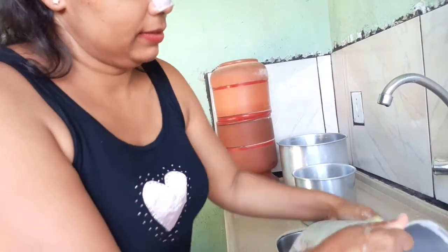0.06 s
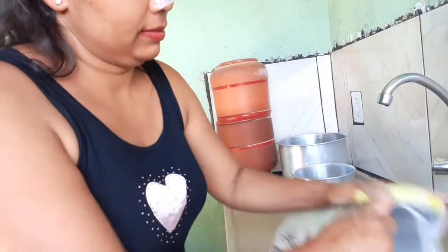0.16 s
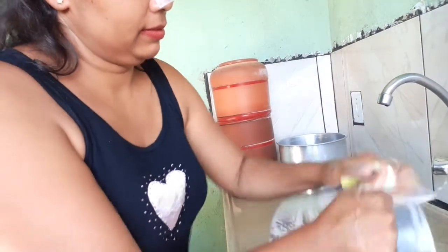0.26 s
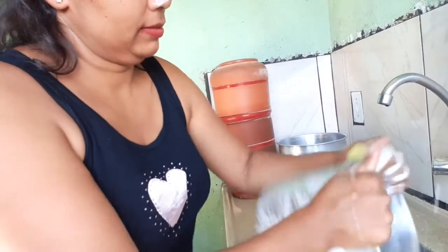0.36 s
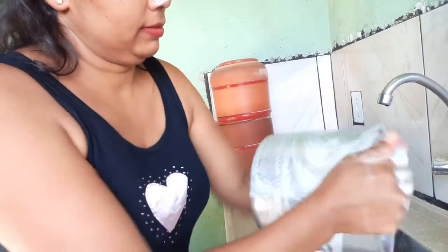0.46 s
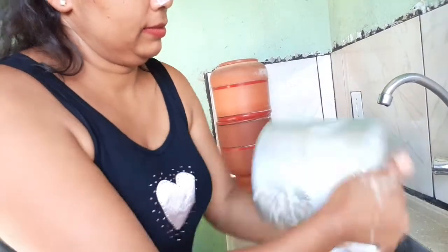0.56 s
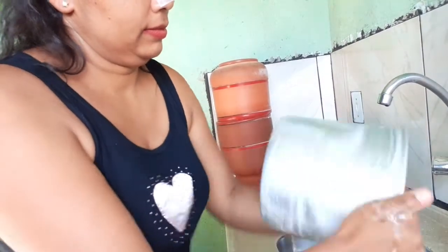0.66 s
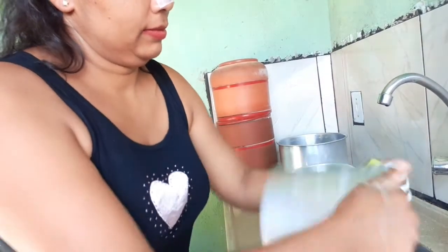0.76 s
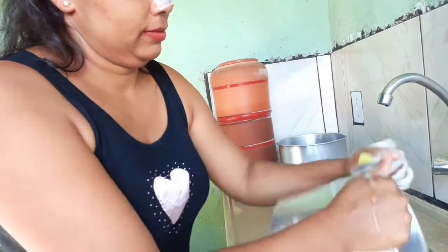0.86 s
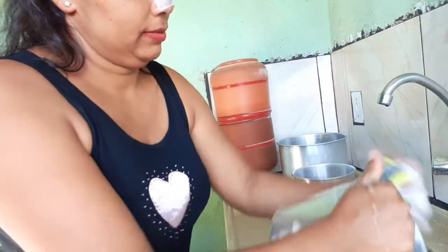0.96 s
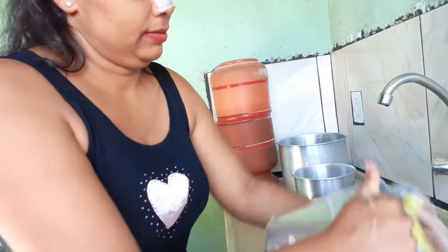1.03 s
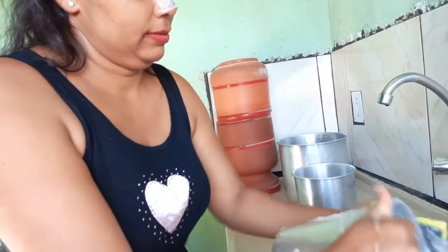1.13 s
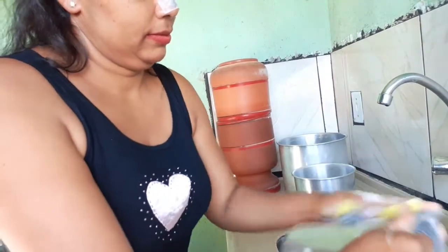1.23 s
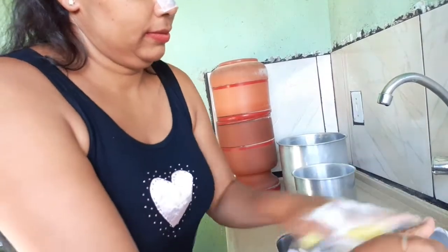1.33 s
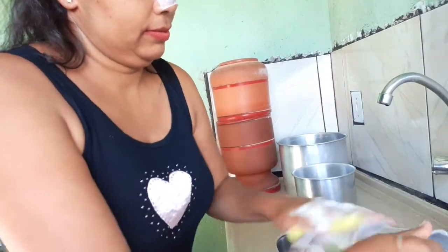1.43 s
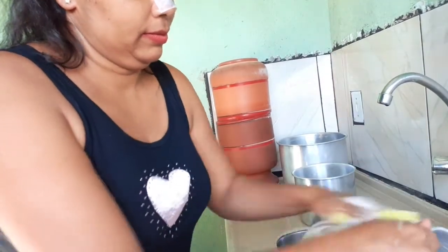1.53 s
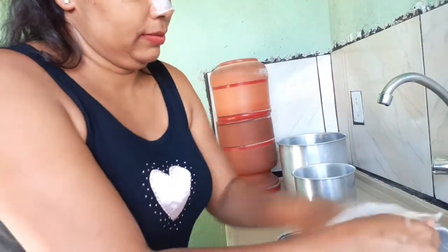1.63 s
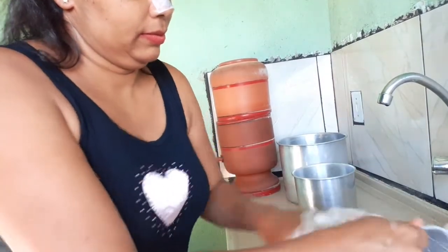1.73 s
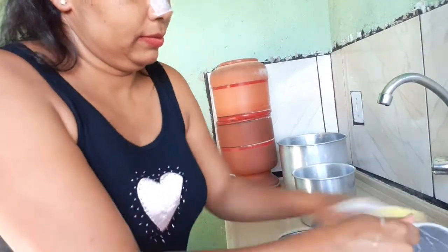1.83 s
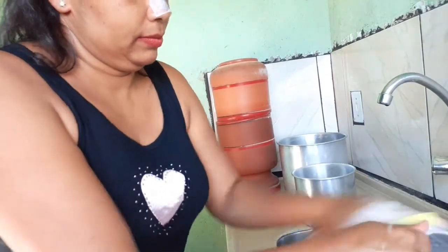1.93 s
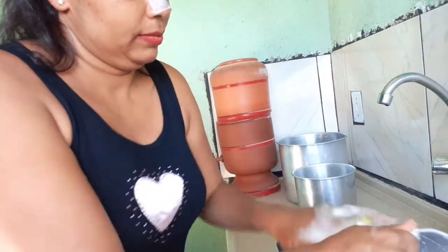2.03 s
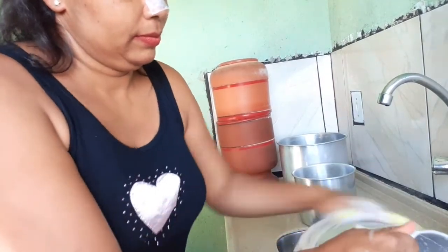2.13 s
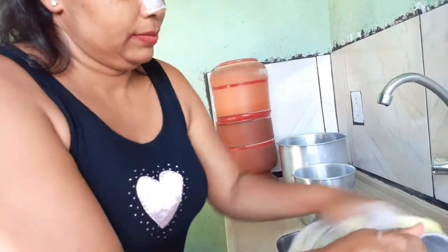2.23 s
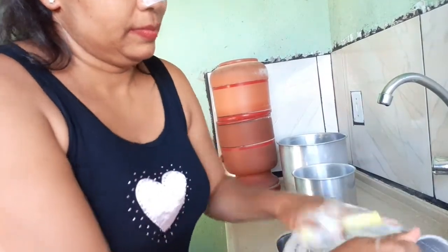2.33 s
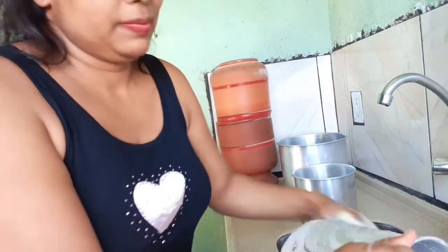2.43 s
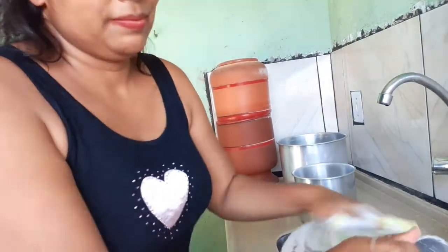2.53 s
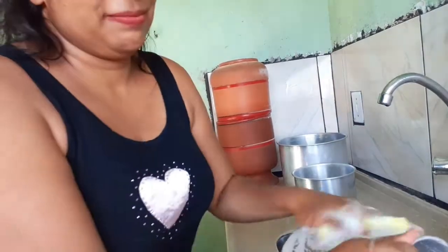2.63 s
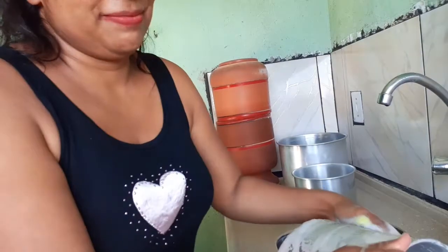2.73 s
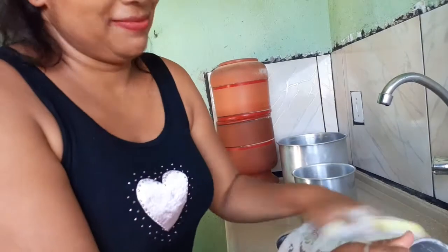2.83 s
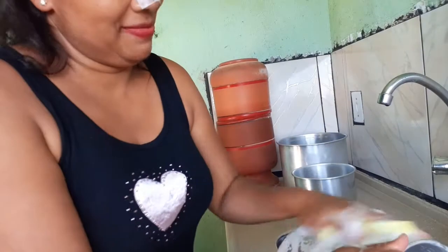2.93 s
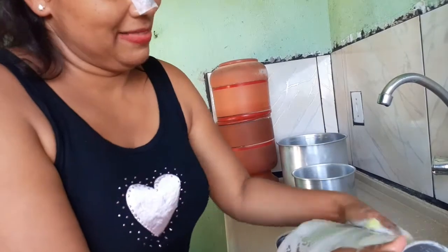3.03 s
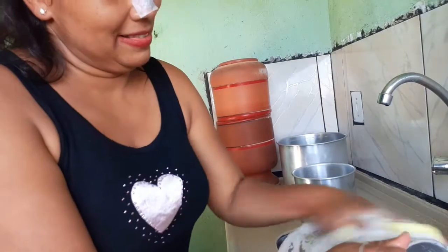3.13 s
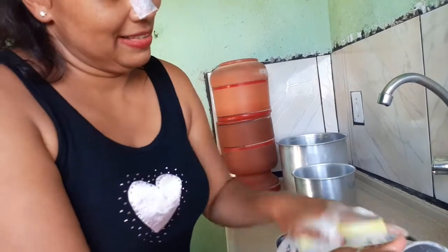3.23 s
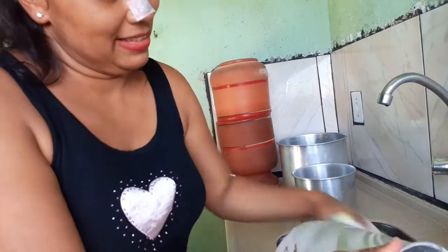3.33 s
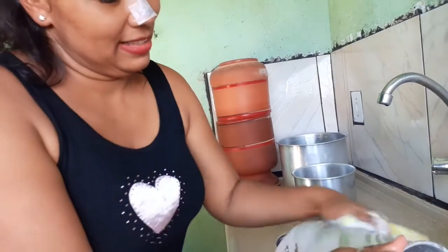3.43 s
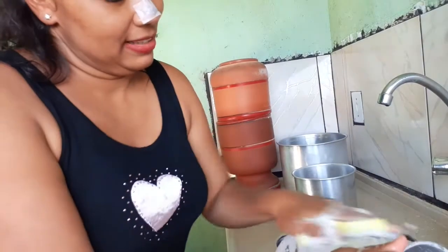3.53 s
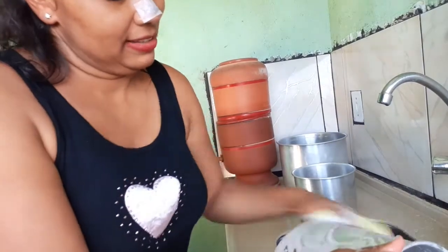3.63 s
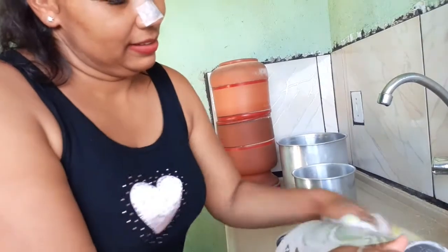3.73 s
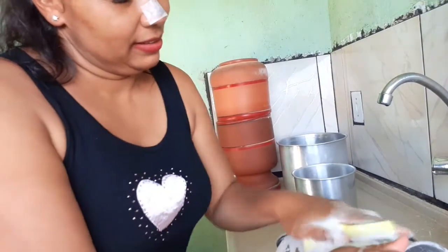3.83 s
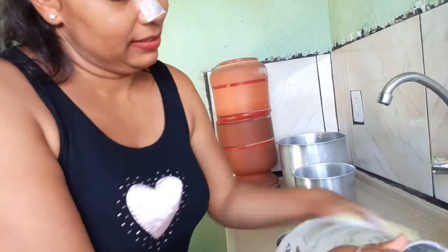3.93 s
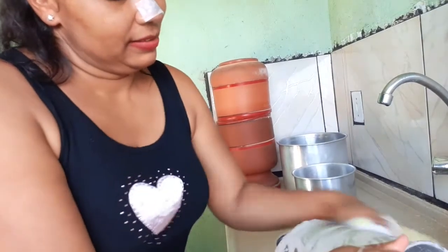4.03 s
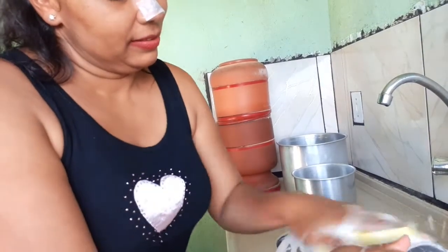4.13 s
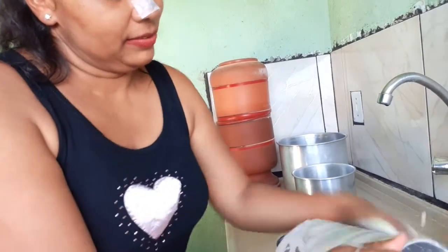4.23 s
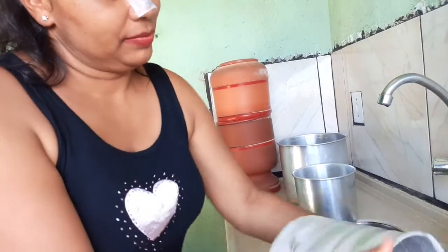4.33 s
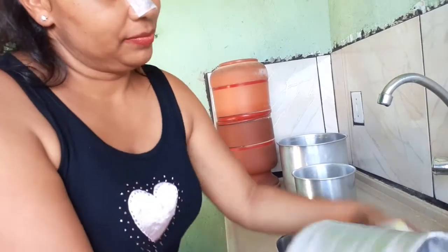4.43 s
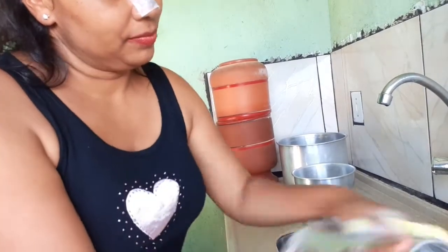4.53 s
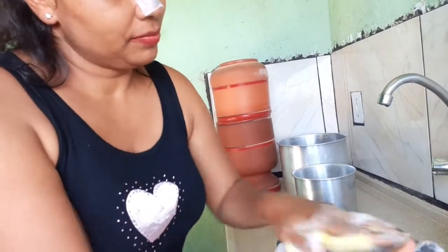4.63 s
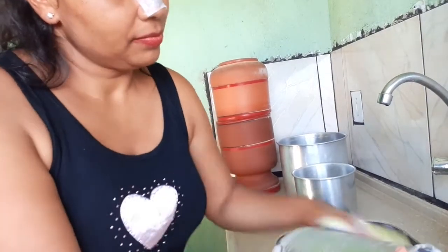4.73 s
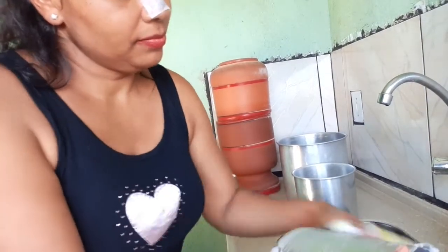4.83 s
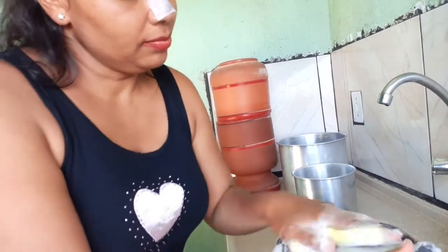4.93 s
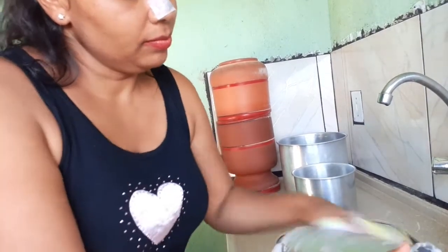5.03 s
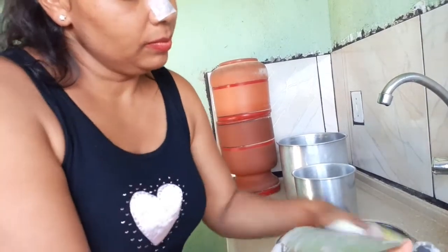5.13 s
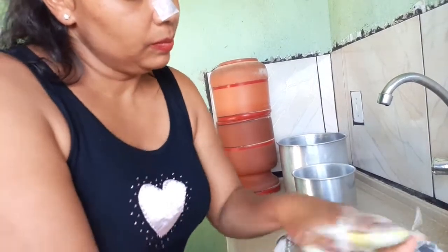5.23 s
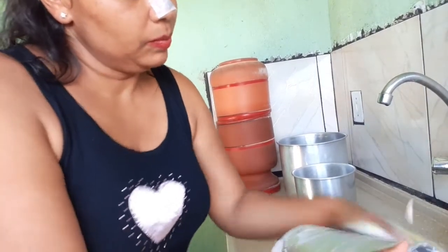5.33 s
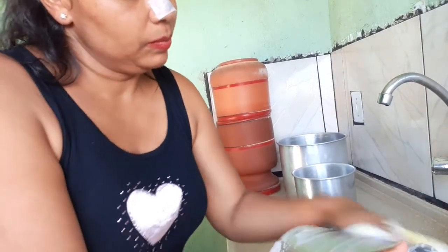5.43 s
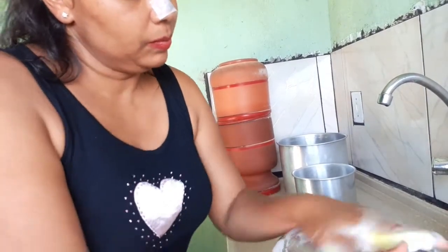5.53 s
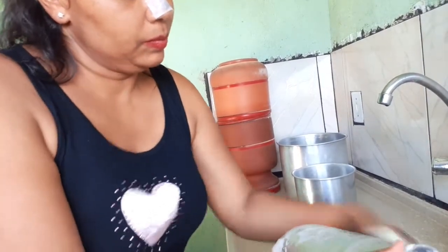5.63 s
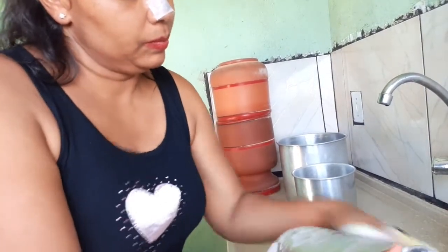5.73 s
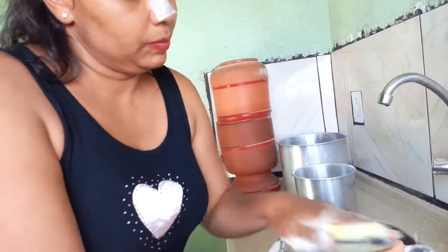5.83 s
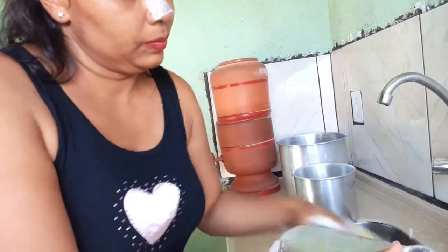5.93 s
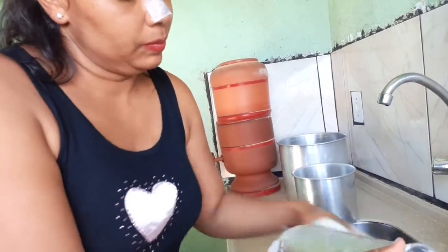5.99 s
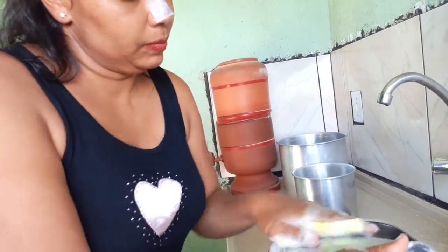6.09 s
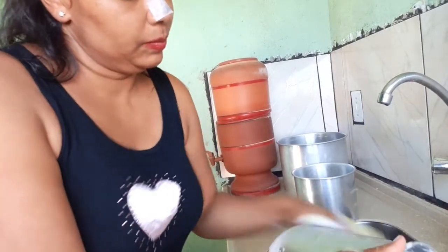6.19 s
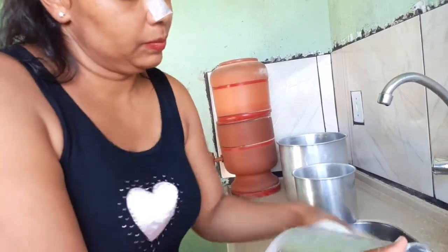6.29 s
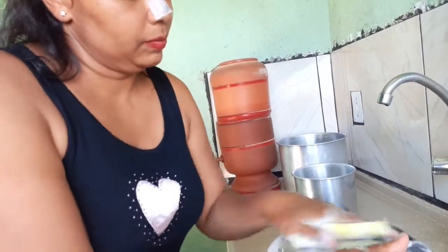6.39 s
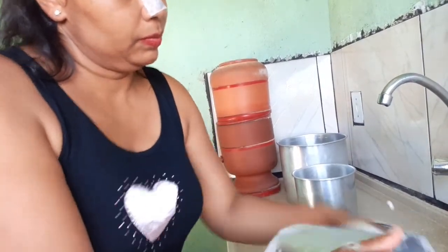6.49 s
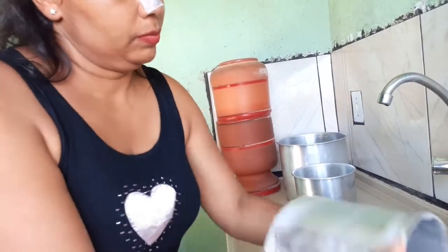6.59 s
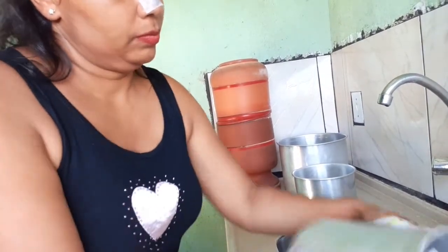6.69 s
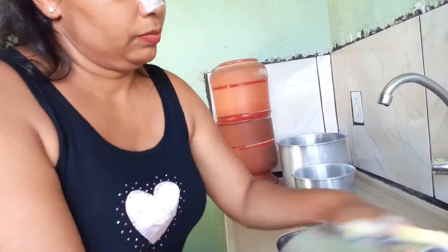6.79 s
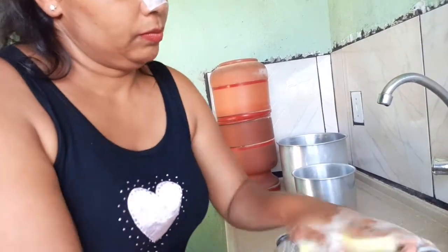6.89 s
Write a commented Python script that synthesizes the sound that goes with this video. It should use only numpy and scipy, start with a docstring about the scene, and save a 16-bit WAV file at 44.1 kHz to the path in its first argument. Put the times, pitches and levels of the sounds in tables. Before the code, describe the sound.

A soapy sponge scours a thin metal pot in quick back-and-forth rasps, with one loud hollow boom as it bumps the sink.

```python
"""At a kitchen sink in a small tiled room, a soapy aluminium pot is scoured with a sponge.
Fibres hiss and rasp in back-and-forth strokes: coloured noise, roughened by many tiny snaps.
The pot's wall rings faintly under them as resonant noise, and its base rubs on the basin.
Bumps boom in the sink as decaying modes; short noise bursts are wet slaps, rubs and the bumps' bright crack.
Behind lie quiet room air and a faint low drone."""
import sys
import numpy as np
from scipy import signal
from scipy.fft import rfft, irfft, next_fast_len
from scipy.io import wavfile
from scipy.ndimage import map_coordinates

SR = 44100
rng = np.random.default_rng(int(sys.argv[2]) if len(sys.argv) > 2 else 0)


def int16_out(signal):
    """Quantize to a 16-bit WAV file."""
    q = np.round(np.clip(np.atleast_2d(signal).T, -1, 1) * 32767)
    wavfile.write(sys.argv[1], SR, q.astype(np.int16))


N = 306617
TIME = np.arange(N) / SR
FREQ = np.fft.rfftfreq(N, 1 / SR) + 1e-3  # just above zero, so that its logarithm exists
LEFT_LAG_S = 9e-5  # the right microphone is nearer


def undb(db):
    """Decibels to gain."""
    return 10 ** (np.asarray(db) / 20)


def unit(x):
    """Scale to rms 1."""
    return x / np.sqrt(np.mean(x ** 2))


def curves(table):
    """Each column of a table as a line through time."""
    seconds, *columns = np.transpose(table)
    return [np.interp(TIME, seconds, column) for column in columns]


def colour(points):
    """Gain at each frequency from (Hz, dB) points."""
    hz, db = np.transpose(points)
    return undb(np.interp(np.log(FREQ), np.log(hz), db))


def resonances(modes):
    """Gain at each frequency of (Hz, width in Hz, dB) resonances, summed in power."""
    power = 0
    for hz, width, db in modes:
        detuning = hz / width * (FREQ / hz - hz / FREQ)
        power = power + undb(db) ** 2 / (1 + detuning ** 2)
    return np.sqrt(power)


def noise(gain, apart_hz=1250):
    """Coloured noise at two close microphones: alike in the bass, almost unrelated in the treble."""
    size = next_fast_len(N, True)
    hz = np.fft.rfftfreq(size, 1 / SR)
    mid, side = rfft(rng.standard_normal((2, size)))
    spread = np.clip(hz / apart_hz, .22, .83)
    pair = (mid + np.array([[1], [-1]]) * spread * side) / np.sqrt(1 + spread ** 2)
    pair[0] *= np.exp(-2j * np.pi * hz * LEFT_LAG_S)
    return unit(irfft(pair * np.interp(hz, FREQ, gain), size)[:, :N])


def walk(rate):
    """Random wandering of rms 1, in straight lines between `rate` points a second."""
    knots = np.arange(0, N / SR + 1, 1 / rate)
    return unit(np.interp(TIME, knots, rng.standard_normal(len(knots))))


def fade(t, t60):
    """Exponential decay, 60 dB down at t60."""
    return np.exp(-np.log(1000) * t / t60)


def pan(x, db):
    """Tip a pair to the left by db, or to the right if negative."""
    return x * undb(np.array([[db], [-db]]) / 2)


def add(out, s, x):
    """Mix x into out from time s."""
    start = max(int(s * SR), 0)
    part = x[:, :N - start]
    out[:, start:start + part.shape[1]] += part


# Colour of the room air. Each row: frequency in Hz, level in dB per Hz.
AIR_COLOUR = [(25, -24), (60, -21), (150, 6), (400, -4.5), (1000, -7), (4000, -22), (15000, -38)]
# Swell of the low drone. Each row: time in seconds, level in dB before panning.
DRONE_SWELL = [(0, -69), (2.3, -73), (2.9, -64), (3.6, -72), (4.2, -66), (5, -60.5), (5.7, -61.5),
               (6.2, -56.5), (6.95, -63)]


def background():
    """Quiet room air, and a low drone of noise around 64 Hz that slowly swells and ebbs."""
    drone = noise(resonances([(64.0, 31, 0)]) ** 2) * undb(curves(DRONE_SWELL)[0])
    air = undb(-71.5) * noise(colour(AIR_COLOUR))
    return pan(drone, -4.0) + air


# Modes of the sink basin with the pot against it; the base rub stirs them too.
# Each row: frequency in Hz, relative dB struck on its floor, relative dB struck on its wall, t60 in seconds.
SINK_MODES = [(75.4, -24, -9, .75), (111, -18, -3, .66), (121, -14, -5, .52), (161, -8, -.5, .34),
              (180, -12, -8, .35), (197, -3, -6, .32), (234, -4, 1, .37), (259, -2, 0, .42),
              (293, -12, -14, .4), (337, -11, -13, .48), (363, -6, -2, .3), (382, -8, -11, .28),
              (410, -3, -6, .33), (422, 0, -10, .36), (444, -1, -6, .28), (469, -5, -9, .27),
              (496, -4, -7, .4), (511, -5, -6, .27), (530, -6, -12, .25), (552, 0, -7, .27),
              (568, -1, -1, .27), (586, -7, -14, .33), (619, -2, -7, .28), (636, -6, -9, .42),
              (683, -13, -24, .25), (706, -8, -19, .25), (738, -9, -19, .25), (762, -12, -21, .25),
              (781, -9, -21, .27), (823, -15, -18, .3), (843, -10, -14, .27), (871, -8, -16, .25),
              (905, -14, -18, .22), (945, -9, -14, .28), (1005, -23, -20, .27), (1274, -19, -22, .3),
              (1298, -18, -22, .26), (1350, -20, -24, .22), (1421, -24, -26, .28)]
SKEW_HZ = 703  # from here up a mode is one radian out of step between the microphones
BUILD_S, BUILD_CYCLES = .016, 3  # a mode builds up over this time plus this many of its cycles


def sink_modes(t, ears):
    """Each basin mode as a decaying complex tone that builds up, a little out of step at the two ears."""
    mode_hz, _, _, t60s = np.transpose(SINK_MODES)
    skew = rng.choice([-1, 1], len(SINK_MODES)) * np.minimum(mode_hz / SKEW_HZ, 1)
    modes = []
    for hz, t60, angle in zip(mode_hz, t60s, skew):
        envelope = fade(t, t60) * (1 - fade(t, BUILD_S + BUILD_CYCLES / hz))
        phase = 2 * np.pi * hz * ears + np.array([[angle], [-angle]]) / 2
        modes.append(envelope * np.exp(1j * phase))
    return np.array(modes)


# Echoes of the sheet's swing from the tiled corner. Each row: delay in seconds, level in dB.
TILE_ECHOES = [(.0098, -9), (.0132, -9), (.0168, -8), (.024, -7)]
SWING_HZ, SWING_DB = 600, 1.5  # what an ever harder contact would approach
SWING_T60_S, SWING_RISE_T60_S = .03, .0015
OVERTONE_RATIO, OVERTONE_DB = 1.6, -3
SOFT_HZ = 397  # a contact this soft halves the pitch of the swing


def sheet_thud(contact_hz, t, ears):
    """The sheet swings for a few cycles, lower and weaker under a soft contact; the tiles echo it."""
    softness = contact_hz / (contact_hz + SOFT_HZ)
    phase = 2 * np.pi * SWING_HZ * softness * ears
    wave = np.sin(phase) - undb(OVERTONE_DB) * np.sin(OVERTONE_RATIO * phase)
    envelope = fade(t, SWING_T60_S) - fade(t, SWING_RISE_T60_S)
    swing = undb(SWING_DB) * softness * envelope * wave
    echoes = sum(undb(db) * np.roll(swing, int(lag * SR), axis=1) for lag, db in TILE_ECHOES)
    return swing + echoes


# Highest pitch in Hz, spot from 0 floor to 1 wall, share of the ring time.
NUDGE = (218, 0.29, 1.0)


def nudges():
    """Each stroke starts by rocking the pot against the basin with a soft contact."""
    return [(s, nudge_db, *NUDGE) for s, *_, nudge_db in STROKES]


# The dense, weaker ring of basin and counter. Each row: frequency in Hz, level in dB per Hz.
BOOM_COLOUR = [(40, -26.5), (110, -11), (250, -4), (520, -0.5), (880, 2.5), (1120, -15.5), (1350, -4.5),
               (1700, -10.5), (2100, -18.5), (2450, -10), (3000, -31.5)]
BOOM_DB, BOOM_T60_S, BOOM_HIGH_T60_S = -19, .45, .3
# The pot bumps the sink; the two rows near 0.71 s are a tap on the pot held in the hand. Each row: start in #
# seconds, relative level in dB, highest pitch in Hz that the contact excites, spot from 0 floor to 1 wall, #
# share of the ring time that the grip leaves (.2 to 1.2 at most).
BUMPS = [(.245, -40, 296, .06, 0.59), (.323, -42, 281, 0.34, 0.43), (0.547, -40.5, 283, 0.033, 1.4),
         (0.601, -37, 257, 0.34, 0.87), (0.643, -38, 240, 0.76, 0.45),
         (0.7115, -34, 845, 0.42, 0.46), (0.712, -30, 218.3, .6, .65),
         (1.1284, -8, 2000, 0.066, 1.215), (1.817, -37.5, 365, 0.38, 1.04),
         (1.961, -39.5, 247, 0.55, 1.6), (2.019, -39, 130, 0.71, 0.88),
         (3.277, -49, 258, 0.27, 0.64), (3.599, -49, 200, .6, .8), (4.4061, -18.5, 543, 0.84, 1.1),
         (4.638, -38.5, 308, 0.14, 0.44), (6.649, -46, 171, 0.58, 0.74),
         (6.76, -20.5, 208, 1, 1.05)]


def bumps():
    """Each bump rings the basin: the spot weights its modes, a soft contact dulls them, the grip sets their length."""
    out, t = np.zeros((2, N)), TIME[:2 * SR // 3]
    ears = np.maximum(t - np.array([[LEFT_LAG_S], [0]]), 0)
    _, floor_db, wall_db, t60s = np.transpose(SINK_MODES)
    modes = sink_modes(t, ears)
    dense = noise(colour(BOOM_COLOUR), apart_hz=1500)
    dense_low = signal.sosfiltfilt(signal.butter(4, 1100, fs=SR, output="sos"), dense)
    for s, db, contact_hz, spot, share in BUMPS + nudges():
        weights = undb(floor_db + np.clip(spot, 0, 1) * (wall_db - floor_db))
        phases = np.exp(2j * np.pi * rng.random(len(SINK_MODES)))
        ring = np.tensordot(phases * weights / np.linalg.norm(weights), modes, 1).imag
        # a random stretch of the dense ring, which loses its treble first
        part = rng.integers(N - SR) + np.arange(len(t))
        low = dense_low[:, part]
        high = dense[:, part] - low
        boom = undb(BOOM_DB) * (low * fade(t, BOOM_T60_S) + high * fade(t, BOOM_HIGH_T60_S))
        # a share below 1 hastens the decay, above 1 slows it
        grip = fade(t * (1 / np.clip(share, .2, 1.2) - 1), t60s.mean())
        blow = sheet_thud(contact_hz, t, ears) + grip * (ring + boom)
        contact = signal.butter(6, contact_hz, fs=SR, output="sos")
        add(out, s, undb(db) * signal.sosfilt(contact, blow))
    # the deepest modes are stronger on the right
    bass = signal.sosfilt(signal.butter(1, 170, fs=SR, output="sos"), out)
    return pan(bass, -6.0) + pan(out - bass, -1.4)


# Colour of the pot's base rubbing on the basin. Each row: frequency in Hz, level in dB per Hz.
RUB_COLOUR = [(60, -16), (110, 1), (165, -5), (197, 7.5), (230, -3), (260, 4), (310, -5.5), (420, 2.5),
              (500, -2), (575, 1), (740, -8), (860, -4.5), (945, -1), (1150, -13), (4000, -48)]
# The pot is lifted and turned, then laid in the sink, which damps it; the wall's ring follows this too.
# Each row: time in seconds, relative dB of the wall's ring against the rasp, relative dB of the base's rub.
HOLD_ON_POT = [(0, -9, -62), (.35, -5, -59), (.6, -24, -55), (.86, -4, -67.5), (1.0, -7, -61),
               (1.7, -6.5, -66), (1.85, 0, -62.5), (2.0, -9, -67), (2.25, -8, -78), (2.85, -8, -67.5),
               (3.2, -8.5, -70), (4.1, -7.5, -69.5), (4.3, -10, -66), (4.7, -3, -66.5), (5.15, -9, -70),
               (5.35, -5.5, -61.5), (5.65, -2.5, -61.5), (5.83, -6.5, -72.5), (5.97, -5, -64.5),
               (6.25, -6, -69), (6.6, -13, -74)]


def base_rub():
    """The pot's base drags on the basin and stirs its modes, fluttering in level."""
    _, base_db = curves(HOLD_ON_POT)
    basin = resonances([(hz, 9, 0) for hz, *_ in SINK_MODES])
    flutter_db = 2.2 * walk(30)
    return pan(noise(colour(RUB_COLOUR) * basin), -1.9) * undb(base_db + 3.5 + flutter_db)


# Wall of the pot, damped by the hand; short bursts and scouring both ring it.
# Each row: frequency in Hz, width in Hz, relative dB lying in the sink, relative dB held in the air.
POT_WALL = [(910, 15, 1.5, -14.5), (950, 7, 2, -15), (1005, 20, -11, -18.5), (1268.5, 19, 1.5, -4),
            (1277, 15, 0, 0.5), (1310, 360, -9.5, -14), (1424, 16, -2.5, -6), (2033, 18, 0, -19.5),
            (2430, 140, -9.5, -14.5)]
# Short noise bursts: wet slaps, rubs, and the bright crack of the pot's bumps. Each row: start in seconds,
# level in dB before panning, centre in Hz, t60 in seconds, ring of the wall in dB relative to the burst.
SHORT_BURSTS = [(0.259, -53.5, 1850, 0.46, -15), (0.7109, -27, 1718, 0.0055, -17),
                (0.713, -40, 5100, 0.063, -25), (.864, -52, 5100, 0.031, -27),
                (0.897, -59, 2490, 0.11, -18), (0.916, -56, 3070, 0.069, -10),
                (1.069, -43, 1640, 0.017, -18), (1.13, -25.5, 1440, 0.022, -28),
                (1.1292, -43, 2325, .02, -31), (1.273, -40.5, 3700, 0.15, -10.5),
                (1.839, -53, 1680, .12, -8), (1.876, -53, 2300, .08, -18), (1.983, -52.5, 1050, .04, -14),
                (4.407, -58, 1260, 0.62, -9), (6.76, -45.5, 2560, 0.027, -26)]


def short_bursts(room_db=-18, room_t60=0.36, wall_t60=0.25):
    """Each burst is fading noise, with the pot's wall answering in sines and the tiles' echo as a noise tail."""
    out, t = np.zeros((2, N)), TIME[:SR // 2]
    wall = np.zeros((2, len(t)))
    for hz, _, _, db in POT_WALL:
        phase = rng.uniform(0, np.pi / 2, (2, 1))
        wall += undb(db) * np.sin(2 * np.pi * hz * t + phase)
    wall *= fade(t, wall_t60)
    for s, db, hz, t60, wall_db in SHORT_BURSTS:
        dulling = np.hypot(1, (FREQ / (1.2 * hz)) ** 3)
        burst = noise(resonances([(hz, 0.46 * hz, 0)]) / dulling, apart_hz=2180)[:, :len(t)]
        envelope = fade(t, t60) + undb(room_db) * fade(t, room_t60)
        add(out, s, undb(db) * (burst * envelope + undb(wall_db) * wall))
    return pan(out, -0.67)


# Strokes of the sponge. Each row: start in seconds, length in seconds, attack in seconds, relative dB of the
# sliding fibres' hiss, relative dB of their biting rasp, relative dB of the nudge to the pot.
STROKES = [(0, 0.071, 0.00047, -46, -55, -37), (0.077, 0.19, 0.063, -48.5, -52, -27.5),
           (0.284, 0.33, 0.25, -44, -41.5, -52), (0.691, 0.089, 0.013, -57, -52.5, -34),
           (0.937, 0.11, 0.09, -50.5, -48, -65), (1.078, 0.28, 0.037, -54.5, -54.5, -67),
           (1.251, 0.17, 0.048, -50.5, -56, -59), (1.417, 0.32, 0.042, -49, -56.5, -42.5),
           (1.744, 0.3, 0.045, -49, -56, -67), (2.058, 0.42, 0.028, -48.5, -59.5, -49),
           (2.48, 0.16, 0.065, -45, -54, -68.5), (2.653, 0.14, 0.047, -46.5, -56, -44),
           (2.799, 0.14, 0.024, -45.5, -53, -41), (2.947, 0.13, 0.026, -46, -54.5, -40),
           (3.089, 0.18, 0.031, -45.5, -55, -51), (3.249, 0.14, 0.019, -45.5, -54.5, -53),
           (3.383, 0.28, 0.06, -44.5, -53.5, -62), (3.665, 0.2, 0.1, -44, -53.5, -57.5),
           (3.868, 0.32, 0.052, -47, -54, -61), (4.175, 0.13, 0.029, -47, -52, -39),
           (4.286, 0.088, 0.0092, -50, -54, -65), (4.484, 0.35, 0.21, -47, -55, -58),
           (4.829, 0.14, 0.04, -45, -53, -43), (4.98, 0.16, 0.059, -46.5, -55, -41),
           (5.143, 0.14, 0.017, -44.5, -52.5, -44.5), (5.288, 0.13, 0.015, -46.5, -51, -54),
           (5.423, 0.14, 0.036, -46.5, -51.5, -39), (5.57, 0.14, 0.033, -46.5, -51, -41),
           (5.711, 0.3, 0.037, -45.5, -53.5, -42), (6.015, 0.13, 0.045, -45.5, -55, -44),
           (6.148, 0.16, 0.037, -47.5, -56, -36.5), (6.309, 0.23, 0.015, -46, -54, -45),
           (6.54, 0.088, 0.019, -51, -57.5, -61.5), (6.742, 0.19, 0.13, -51, -54, -57)]
RELEASE_T60_S = 0.23  # a stroke dies away once the sponge stops
REST_DB = (-64.5, -66.5)  # relative hiss and rasp while the sponge only rests on the pot
BRISK_S = (2.6, 6.4)  # stretch of brisk strokes, from and to
STALL_S, STALL_DB = .013, (-3.5, 0)  # there the hiss dips at each reversal while the rasp does not


def strokes():
    """Hiss and rasp levels through time: each stroke swells, holds and dies away, adding in power."""
    power = undb(REST_DB)[:, None] ** 2 * np.ones(N)
    t, stall = TIME[:SR], np.zeros(N)
    for s, length, attack, hiss_db, rasp_db, _ in STROKES:
        swell = np.sin(np.pi / 2 * np.minimum(t / attack, 1))
        envelope = swell * fade(np.maximum(t - length, 0), RELEASE_T60_S)
        add(power, s, np.outer(undb([hiss_db, rasp_db]), envelope) ** 2)
        if BRISK_S[0] < s < BRISK_S[1]:
            stall += np.exp(-((TIME - s) / STALL_S) ** 2)
    return np.sqrt(power) * undb(np.outer(STALL_DB, stall))


def snags(rate, spread_db, t60):
    """Envelope of fibres that catch and let go: many small snaps and a few large ones."""
    sizes = undb(abs(spread_db) * np.minimum(rng.exponential(size=N), 5))
    snaps = sizes * (rng.random(N) < rate / SR)
    power = signal.lfilter([1], [1, -fade(1 / SR, t60) ** 2], snaps ** 2)
    return unit(np.sqrt(power))


def ripple(depth_db=1.4, spacing_hz=45):
    """Uneven gain over frequency: a fine random ripple."""
    knots = np.arange(0, SR, spacing_hz)
    return undb(depth_db * np.interp(FREQ, knots, rng.standard_normal(len(knots))))


# Colour of the fibres' hiss. Each row: frequency in Hz, level in dB per Hz.
HISS_COLOUR = [(2000, -32.5), (5000, -13), (7400, -11.5), (8300, -6.5), (8900, -4), (10000, -7.5),
               (11500, -9), (13500, -11.5), (15500, -10.5)]
# Colour of the fibres' rasp. Each row: frequency in Hz, level in dB per Hz.
RASP_COLOUR = [(500, -21.5), (1000, -3.5), (1400, -4.5), (1700, -4.5), (2300, -0.5), (2900, 0.5),
               (3800, 1.5), (4800, -3), (7000, -4), (10000, -6.5), (15000, -22.5)]


def snapping_fibres(slide, bite):
    """Fibres hiss as they slide and rasp as they bite, with a fine random ripple in colour, roughened by snaps."""
    uneven = ripple()
    hiss = pan(noise(colour(HISS_COLOUR) * uneven), -.8) * slide * undb(2.0)
    rasp = pan(noise(colour(RASP_COLOUR) * uneven), -2.0) * bite * undb(-1.0)
    return snags(rate=10000, spread_db=1.4, t60=.004) * (hiss + rasp)


# High resonances of the pot. Each row: frequency in Hz, width in Hz, relative level in dB.
POT_SHIMMER = [(2776, 87, 0.5), (2950, 14, 1), (3030, 18, 6), (4390, 110, 4), (4710, 62, 3.5),
               (5610, 330, -3), (6700, 370, -6.5), (11900, 1400, -6.5)]


def wall_ring(bite):
    """The biting fibres stir the damped wall and its higher resonances, as resonant noise."""
    wall_db, _ = curves(HOLD_ON_POT)
    shimmer = pan(noise(resonances(POT_SHIMMER)), -1.2) * bite * undb(-4.0)
    lying = resonances([(hz, width, db) for hz, width, db, _ in POT_WALL])
    wall = pan(noise(lying, apart_hz=1740), -.5) * bite * undb(wall_db - 4 + 2.0 * walk(12))
    return shimmer + wall


# The pot in the air. Each row: time in seconds, free ring of its wall in dB relative to the rasp,
# bend of its pitch by the grip in percent.
LIFT_IN_AIR = [(0, -14, -2.5), (.3, -9, -3), (.4, -7, -2), (.55, -7, 1), (.72, 1, 1.5), (.88, -7, -0.5),
               (1.0, -2, -3), (1.15, -13, -7), (1.5, -40, -0.5)]


def free_ring(bite):
    """Held in the air, the wall sings on one main note; reading the noise faster or slower bends it."""
    free_db, bend = curves(LIFT_IN_AIR)
    held = noise(resonances([(hz, width, db) for hz, width, _, db in POT_WALL]), apart_hz=1700)
    position = np.cumsum(1 + bend / 100)
    bent = np.array([map_coordinates(channel, [position], mode="mirror") for channel in held])
    return bent * bite * undb(free_db)


def scouring():
    """The strokes drive fibres and pot alike, under a common quick judder in level."""
    slide, bite = strokes()
    judder = undb(0.33 * walk(51))
    return judder * (snapping_fibres(slide, bite) + wall_ring(bite) + free_ring(bite))


def scene():
    """Everything heard at the sink."""
    return background() + base_rub() + bumps() + short_bursts() + scouring()


def record(dry):
    """The phone cuts the deepest bass and the top."""
    thinned = signal.sosfilt(signal.butter(3, 45, "high", fs=SR, output="sos"), dry)
    return signal.sosfilt(signal.ellip(12, .2, 70, 15420, fs=SR, output="sos"), thinned)


dry = scene()
out = record(dry)
int16_out(out)
```